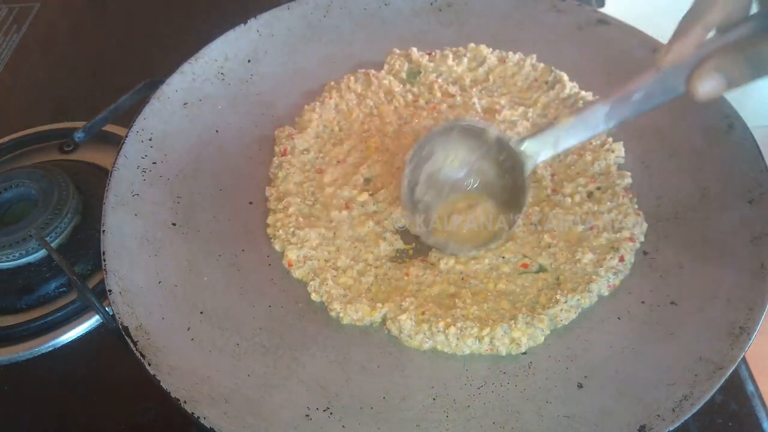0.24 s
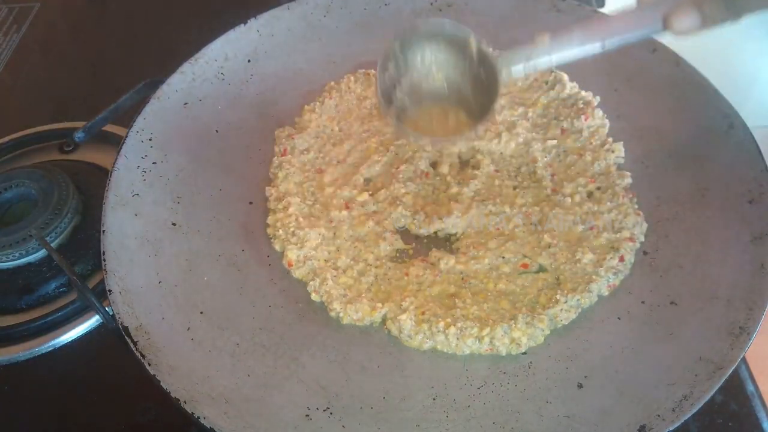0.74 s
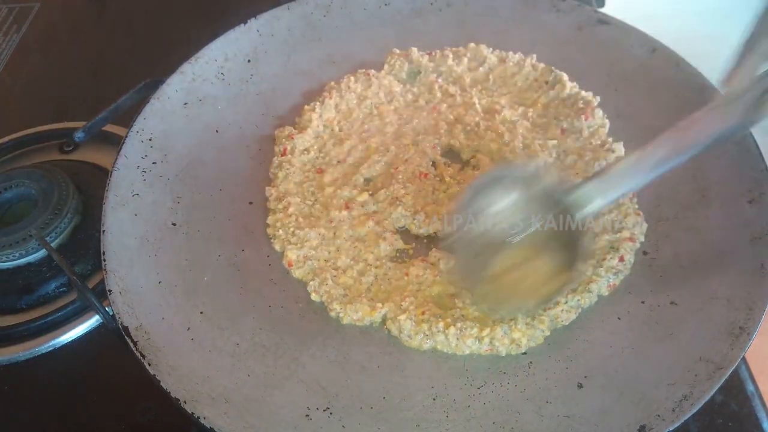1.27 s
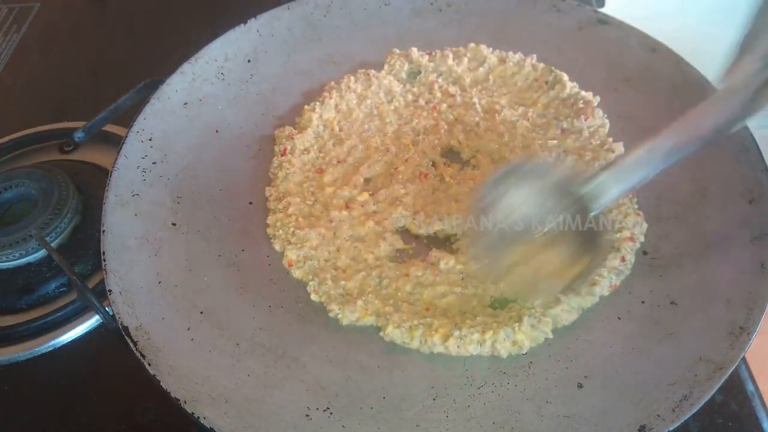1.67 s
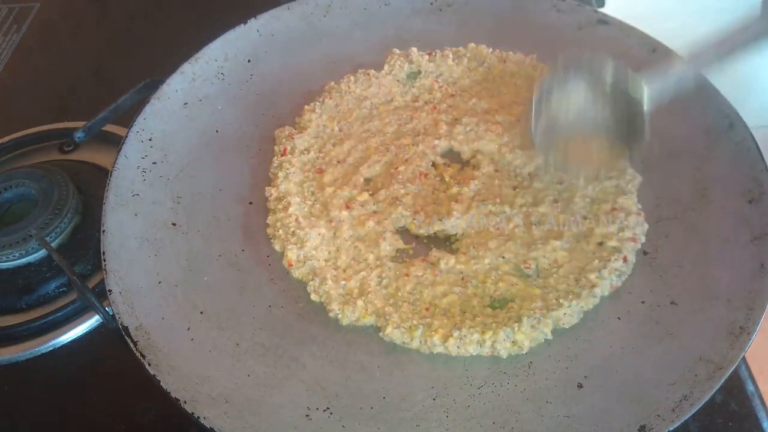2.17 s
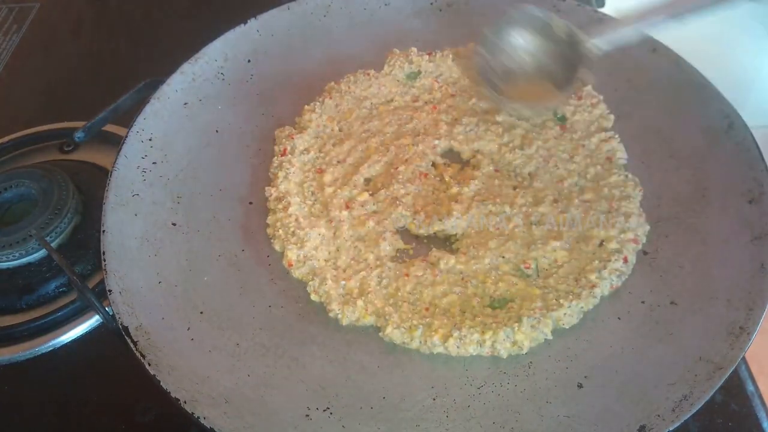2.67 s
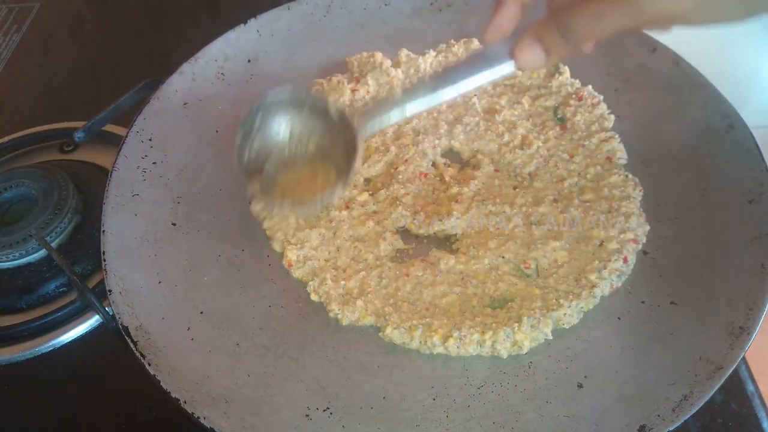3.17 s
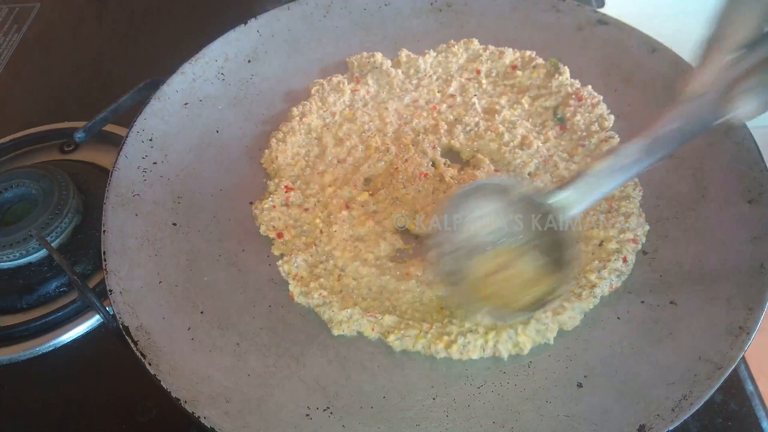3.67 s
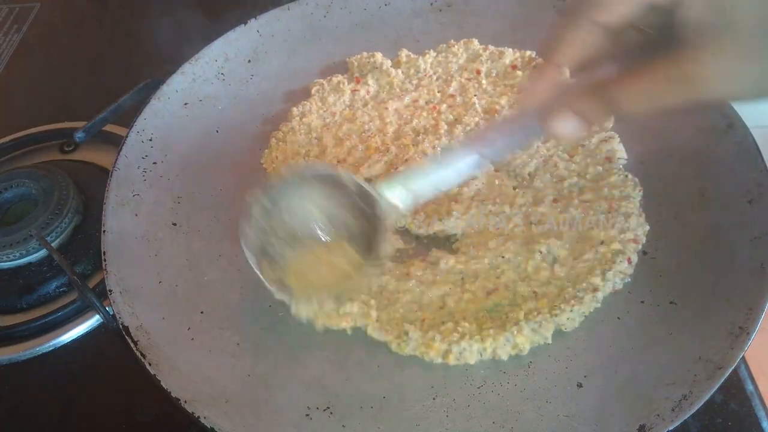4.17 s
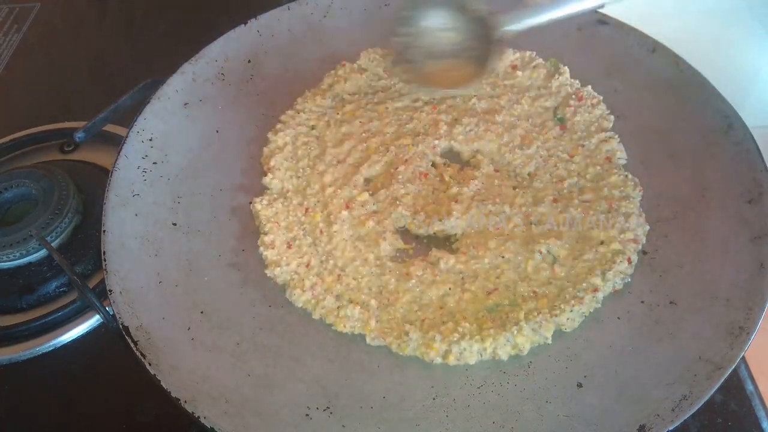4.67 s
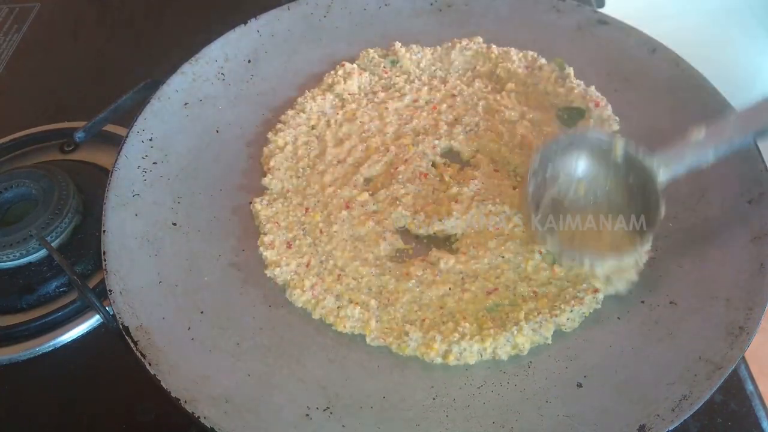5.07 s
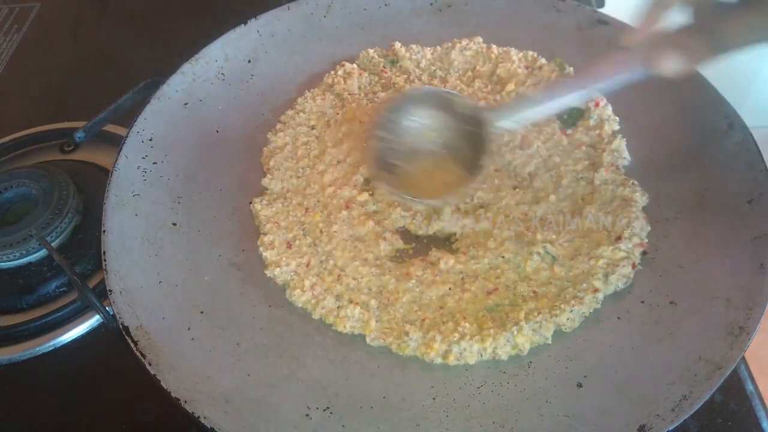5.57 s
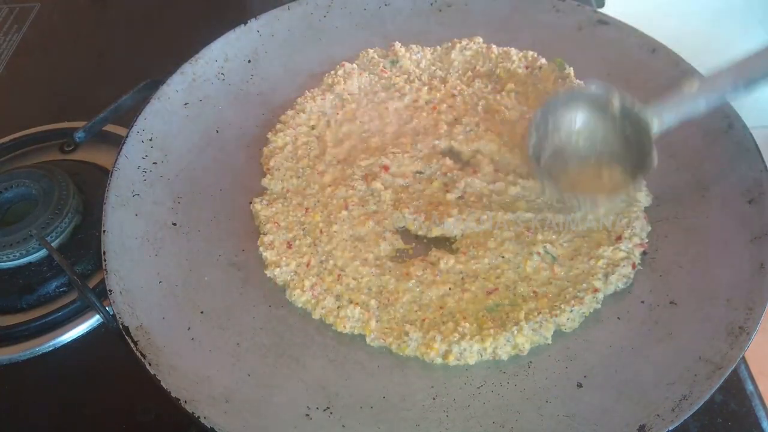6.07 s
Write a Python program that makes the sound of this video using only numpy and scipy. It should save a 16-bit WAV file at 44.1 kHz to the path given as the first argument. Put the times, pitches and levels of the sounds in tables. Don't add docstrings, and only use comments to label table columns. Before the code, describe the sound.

Close, hissing batter fries on a hot griddle, fizzing and snapping without pause, dipping then swelling, over a barely audible burner and distant traffic.

```python
import sys
import numpy as np
from scipy import signal
from scipy.fft import rfft, irfft
from scipy.io import wavfile
from scipy.ndimage import uniform_filter1d

SR = 44100
rng = np.random.default_rng(int(sys.argv[2]) if len(sys.argv) > 2 else 0)


def gain_from_decibels(decibels):
    exponent = np.asarray(decibels, float) / 20
    return 10 ** exponent


def master_out(mix):
    frames = np.transpose(np.atleast_2d(mix))
    ceiling = np.clip(frames, -1, 1)
    pcm = np.round(ceiling * 32767).astype(np.int16)
    wavfile.write(sys.argv[1], SR, pcm)


N = 279594
T = np.arange(N) / SR

# [t/s, boil level/dB, share bursting at the right rim/0-1, treble left over right/dB]
BOIL = [(0.0, -20.5, .5, -5), (0.4, -20.5, 0.26, -4), (0.65, -24, .35, -4.5), (1.15, -24.5, 0.7, -4.5),
        (1.47, -26.5, 0.95, -4), (1.72, -27.5, 0.85, -6), (2.1, -25, .9, -6.5), (2.76, -22.5, .95, -7),
        (3.0, -19.5, 0.7, -5.5), (3.33, -19.5, 1, -4.5), (3.45, -20, .1, -3), (4.15, -18.5, 0.35, -5),
        (4.75, -19.5, 0.5, -5), (5.2, -18, .2, -5), (5.62, -21, 0.8, -6), (5.92, -23, 0.5, -5),
        (6.34, -24, 0.3, -6)]
# [t of the flare's height/s, fizz lift/dB, extra lift of the wet dull part/dB, length/s]
DRIPS = [(0.076, 0, 1, .1), (0.255, 2, 0.5, 0.11), (0.806, 1.5, 3.5, .12), (1.07, 1, 4, 0.047),
         (1.29, 1, -0.5, 0.079), (1.577, 2, 0, 0.16), (1.858, 5, -2, 0.075), (2.021, 4.5, -0.5, 0.068),
         (2.225, 3, -3.5, 0.11), (2.435, 2, 0, 0.17), (2.666, 2, -0.5, 0.16), (2.86, 0.5, 0, 0.075),
         (3.177, 0.5, 4, 0.31), (3.76, 0, 1, 0.14), (4.276, -1.2, 2, 0.089), (4.873, 0, 2, .08),
         (5.064, 0.5, 1, 0.11), (5.745, 3, 0, 0.084), (6.026, 2.5, 0.5, 0.041), (6.266, 0.5, 1, 0.071)]
# [t/s, loss/dB, length/s]
SIZZLE_DIPS = [
    (0.915, 0.5, 0.041),
    (1.222, 2, 0.052),
    (1.477, 3, 0.046),
    (1.702, 2, .07),
    (2.55, -0.5, 0.043),
    (2.767, 1.5, 0.05),
    (5.66, 0.5, 0.085),
    (6.19, 1, 0.049),
]
# [t/s, peak level/dB]
LARGE_BURSTS = [(0.0558, -6), (0.2264, -6), (0.9408, -9), (1.27, -8), (1.3723, -8), (1.509, -9),
                (1.5833, -5), (1.722, -10), (1.7529, -7), (1.7858, -7), (1.9175, -6), (1.941, -8),
                (2.0004, -6), (2.0896, -7), (2.1904, -9), (2.2483, -5), (2.4219, -2), (2.5551, -5),
                (2.6339, -4), (2.8609, -3), (3.052, -3), (3.255, -3), (3.5833, -4), (3.6566, -2),
                (4.2288, -2), (4.9541, -2), (5.1367, -4), (5.6121, -4), (5.6575, -4), (6.2233, -11)]
# [f/Hz, left level/dB per Hz, right level/dB per Hz]
PORT_COLOUR = [(290, -38.5, -33), (500, -29.5, -26), (750, -24, -26), (1154, -22, -19.5), (1730, -19, -15),
               (2670, -17.5, -15), (3670, -16.5, -12), (5900, -13, -11.5), (7040, -10.5, -7.5),
               (8550, -4, -4.5), (9240, -3, -0.8), (10360, -4.5, 2), (12340, -10, -2.5), (16400, -13, -12)]
# [f/Hz, width/Hz, level/dB]
IRON_RINGS = [(536, 20, -7.5), (896, 53, -11), (945, 24, -8.5), (1533, 42, -9.5), (1774, 110, -17)]
# [t/s, peak level/dB]
OVERLOAD_TICKS = [(3.3292, -28), (3.6595, -31), (3.8589, -28.5), (4.1655, -32), (4.4308, -33),
                  (4.4513, -24), (4.6828, -32), (4.734, -28), (4.892, -33), (4.9555, -24.5), (5.419, -33),
                  (5.669, -28), (5.824, -31)]
# [f/Hz, level/dB per Hz]
RUMBLE_COLOUR = [(21, -40), (36, -5), (92, 1.5), (194, -1.5), (256, -12), (342, -5), (420, -10.5),
                 (550, -19), (920, -120)]
# [f/Hz, likeness/0-1]
RUMBLE_LIKENESS = [(60, 1), (140, 0.96), (330, 0.36), (800, 0.52)]
# [t/s, level/dB, length/s]
THROTTLE_BLIPS = [(0.1, -52, .16), (0.5, -55, .24), (0.8, -62, .3), (1.27, -62, .1), (1.73, -60, .35),
                  (2.1, -66, .2), (2.673, -54, 0.2), (3.103, -54, .2), (3.57, -59, 0.091), (4.07, -62, .07),
                  (5.05, -60, .1), (5.95, -60, .14)]
# [start t/s, length/s, f/Hz, level/dB]
TRAFFIC_MOANS = [
    (.68, 0.33, 347, -56.5),
    (1.24, 0.21, 320, -57),
    (2.199, 0.36, 330.4, -55),
    (2.7, 0.12, 345.5, -60),
]
# [from t/s, to t/s]
TREBLE_APART = [(.11, .24), (.565, .655), (.68, .76), (1.11, 1.29), (1.42, 1.55), (1.835, 1.91),
                (2.16, 2.23), (2.71, 2.785), (3.82, 3.895), (4.415, 4.49), (4.7, 4.77), (5.207, 5.28),
                (5.72, 5.79)]


def batter():
    t, *columns = np.transpose(BOIL)
    boil_db, right, pan_db = (np.interp(T, t, column) for column in columns)
    right = np.clip(right, 0, 1)
    fizz_db = boil_db + sum(db * bump(at, length) for at, db, _, length in DRIPS)
    fizz_db = fizz_db - sum(db * bump(at, length) for at, db, length in SIZZLE_DIPS)
    wet_db = sum(db * bump(at, length) for at, _, db, length in DRIPS)
    above = fizz_db - fizz_db.mean()

    small = patch(right, per_s=2300, spread_db=3.4, wet_db=-2.5)
    large = patch(right, per_s=4000, spread_db=2.5, wet_db=-2.5)
    small += gain_from_decibels(10 + 4 * rng.standard_normal(N)) * (rng.random(N) < 14 / SR)
    add_large_bursts(small, fizz_db)
    spectrum = through_ports(small, large)

    hz = np.fft.rfftfreq(N, 1 / SR)
    low = 1 / (1 + (hz / 2200) ** 4)
    high = 1 / (1 + (6800 / (hz + 1)) ** 8)
    simmer, crackle, fizz = (irfft(spectrum * gain, N) for gain in (low, 1 - low - high, high))
    murmur = irfft(spectrum * low / (1 + (hz / 820) ** 8), N)
    sway = gain_from_decibels(np.outer([.5, -.5], pan_db - pan_db.mean()))
    mix = sway * fizz
    mix += gain_from_decibels(0.5 - 0.062 * above + 0.64 * wet_db) * crackle
    mix += gain_from_decibels(-1.35 - 0.06 * above + wet_db) * (simmer - murmur)
    mix += gain_from_decibels(-0.5 - 0.54 * above) * murmur
    return gain_from_decibels(fizz_db + 1.2) * mix / fizz.std()


def add_large_bursts(small, fizz_db):
    start_db, t60_s, length = -16.5, 0.0096, 400
    spray = gain_from_decibels(start_db - 60 * T[:length] / t60_s) * rng.standard_normal((len(LARGE_BURSTS), length))
    spray[:, 0] = 1
    for (at, db), burst in zip(LARGE_BURSTS, spray):
        i = round(at * SR)
        small[:, i + 24:][:, :length] += gain_from_decibels(db - fizz_db[i] + 5.5) * burst


def patch(right, per_s, spread_db, wet_db):
    rim_lag = 6
    clumps = gain_from_decibels(0.86 * drift(0.00059) + 0.59 * drift(0.12))
    direct = bursts(0.63 * np.sqrt(right) * clumps, .35 * per_s, spread_db, lag=rim_lag, scatter=.5)
    direct += bursts(0.71 * np.sqrt(1 - right) * clumps, .35 * per_s, spread_db, lag=-rim_lag, scatter=0.6)
    direct += bursts(clumps, per_s, spread_db, lag=0, scatter=9)
    direct = evened(direct)
    return direct + gain_from_decibels(wet_db) * kitchen(direct)


def bursts(weight, per_s, spread_db, lag, scatter):
    size = gain_from_decibels(spread_db * np.minimum(rng.exponential(1, N), 5)) * rng.choice([-1., 1.], N)
    train = weight * evened(size * (rng.random(N) < per_s / SR))
    delay = np.round(lag + scatter * rng.standard_normal(N)).astype(int)
    late = np.clip(np.arange(N) + delay, 0, N - 1)
    return np.array([np.bincount(late, train, N), train])


def kitchen(x):
    t60_s = 0.11
    fade = gain_from_decibels(-60 / (t60_s * SR)) ** 2
    energy = signal.lfilter([1 - fade], [1, -fade], x ** 2)
    return rng.standard_normal((2, N)) * np.sqrt(energy)


def through_ports(small, large):
    hz = np.fft.rfftfreq(N, 1 / SR)
    share = 0.88 / (1 + (hz / 4500) ** 2)
    spectrum = np.sqrt(1 - share) * rfft(small) + np.sqrt(share) * rfft(large)
    alike = 0.26 / (1 + (hz / 1100) ** 4)
    spectrum = (1 - alike) * spectrum + alike * 0.96 * spectrum.mean(0)
    grid = np.fft.rfftfreq(4096, 1 / SR)
    f, *ports = np.transpose(PORT_COLOUR)
    responses = [causal(read(np.c_[f, db], grid)) for db in ports]
    rings = sum(gain_from_decibels(db) / (1 + 2j * (hz - f0) / width) for f0, width, db in IRON_RINGS)
    return spectrum * rfft(responses, N) * (1 + rings)


def ticks():
    blips = sum(gain_from_decibels(db) * np.exp(-((T - at) / 0.00025) ** 2) for at, db in OVERLOAD_TICKS)
    return np.outer([0, 1], blips)


def rumble():
    frames, bins = N // 1024 + 5, 200
    hz = np.fft.rfftfreq(4096, 1 / SR)[:bins]
    a, b, c, d, patches = rng.standard_normal((frames, bins, 5)).T
    patches = evened(uniform_filter1d(uniform_filter1d(patches, 3, 0), 10, 1))
    same = np.clip(read(RUMBLE_LIKENESS, hz), -1, 1)[:, None]
    left = a + 1j * b
    right = same * left + np.sqrt(1 - same ** 2) * (c + 1j * d)
    z = np.zeros((2, 2049, frames), complex)
    z[:, :bins] = left, right
    z[:, :bins] *= gain_from_decibels(read(RUMBLE_COLOUR, hz)[:, None] + 2.0 * patches)
    noise = evened(signal.istft(z, nperseg=4096, noverlap=3072)[1][:, :N])
    swell_db = 3 * bump(2.9, 0.89) + 1.5 * drift(0.069)
    return gain_from_decibels(-56 + swell_db - swell_db.mean()) * noise


def drone():
    engine_hz = 62.8 + 4.8 * T - 11.9 * np.exp(-T / 0.251)
    engine = tone(engine_hz * (1 + 0.045 * drift(0.04)))
    blips = sum(gain_from_decibels(db) * bump(at, length) for at, db, length in THROTTLE_BLIPS)
    level = gain_from_decibels(-67.5 + 3.7 * drift(0.1)) + gain_from_decibels(2.2 * drift(0.025)) * blips
    hum = gain_from_decibels(-66 + 4 * drift(0.08)) * tone(101 * (1 + 0.0302 * drift(0.049)))
    return np.sqrt(2) * (level * engine + hum)


def moans():
    out = np.zeros(N)
    for at, length, hz, db in TRAFFIC_MOANS:
        slow = evened(uniform_filter1d(rng.standard_normal(N), size=1100))
        swell = np.exp(-((T - at - length / 2) / (0.67 * length)) ** 4)
        out += gain_from_decibels(db) * slow * np.cos(2 * np.pi * hz * T) * swell
    return out * gain_from_decibels(np.array([[-9], [3]]))


def tone(hz):
    return np.sin(2 * np.pi * np.cumsum(hz) / SR)


def bump(at, length):
    return np.exp(-(2 * (T - at) / length) ** 2)


def drift(seconds):
    width = int(seconds * SR)
    return evened(uniform_filter1d(uniform_filter1d(rng.standard_normal(N), width), width))


def evened(x):
    return x / np.sqrt(np.mean(x ** 2) + 1e-20)


def read(points, hz):
    f, value = np.transpose(points)
    return np.interp(np.log(hz + 1), np.log(f + 1), value)


def causal(db):
    log_gain = np.log(gain_from_decibels(np.maximum(np.r_[db, db[-2:0:-1]], -100)))
    return np.fft.ifft(np.exp(np.conj(signal.hilbert(log_gain)))).real[:1024]


def local_power(z, bins, frames):
    return uniform_filter1d(uniform_filter1d(abs(z) ** 2, size=bins, axis=-2), size=frames, axis=-1)


def scene():
    return batter() + ticks() + rumble() + drone() + moans()


def starved(x):
    turn = np.array([[1, 1], [1, -0.95]]) / np.sqrt(2)
    hz, t, z = signal.stft(turn @ x, SR, nperseg=2048, noverlap=1536)
    near = local_power(z, bins=4, frames=3)
    band = local_power(z, bins=32, frames=9)
    need = .42 * ((hz > 1900) & (hz < 6600)) + .22 * (hz < 1900) * (hz > 550)
    hunger = gain_from_decibels(1.5 * np.interp(t, T, drift(.04)))
    keep = near > need[:, None] * hunger * band
    return turn @ signal.istft(z * keep, SR, nperseg=2048, noverlap=1536)[1][:, :N]


def joined_treble(x):
    hz, t, z = signal.stft(x, SR, nperseg=512)
    hz = hz[:, None]
    mid = z.mean(0)
    strength = local_power(z, bins=12, frames=6)
    mid_strength = local_power(mid, bins=12, frames=6)
    joined = mid * np.sqrt(abs(strength / (mid_strength + 1e-20)))
    apart = sum((t > a) & (t < b) for a, b in TREBLE_APART) > 0
    slips = rng.standard_normal(mid.shape)
    slips = evened(uniform_filter1d(uniform_filter1d(slips, size=14, axis=0), size=8, axis=1))
    apart = apart | (slips > 1.7) & (hz > 9000)
    z = np.where((hz > 7500) & ~apart, joined, z) * (hz < 15750)
    return signal.istft(z, SR, nperseg=512)[1][:, :N]


def top_cut(x):
    return signal.sosfilt(signal.butter(12, 17000, fs=SR, output="sos"), x)


def record(dry):
    overloaded = .9 * np.tanh(dry / .9)
    mix = joined_treble(starved(overloaded))
    return top_cut(mix)


dry = scene()
out = record(dry)
master_out(out)
```